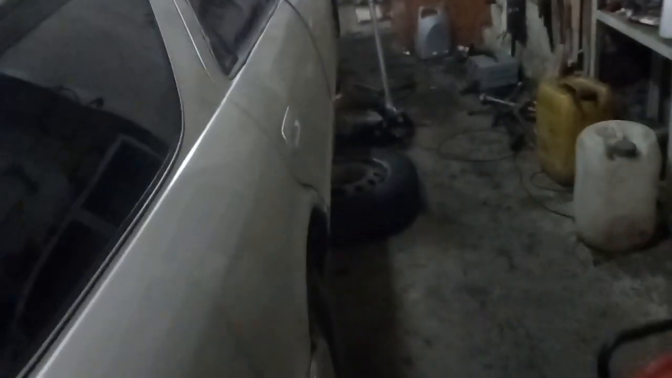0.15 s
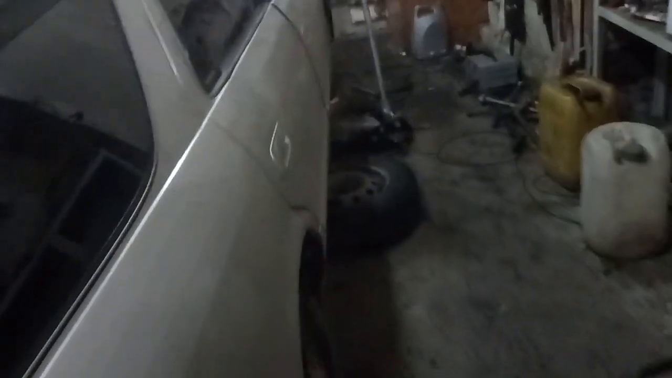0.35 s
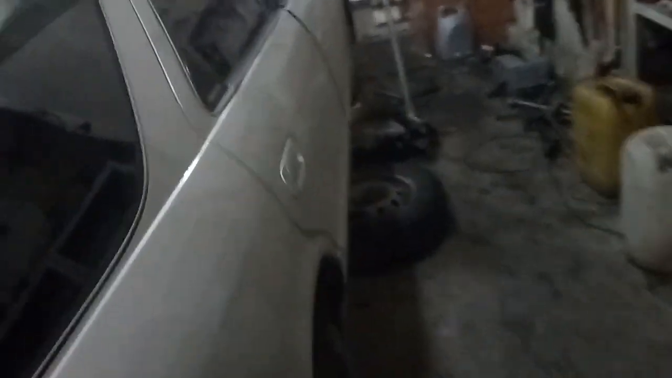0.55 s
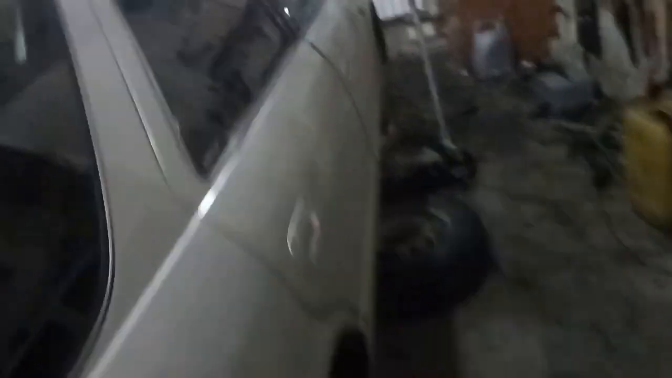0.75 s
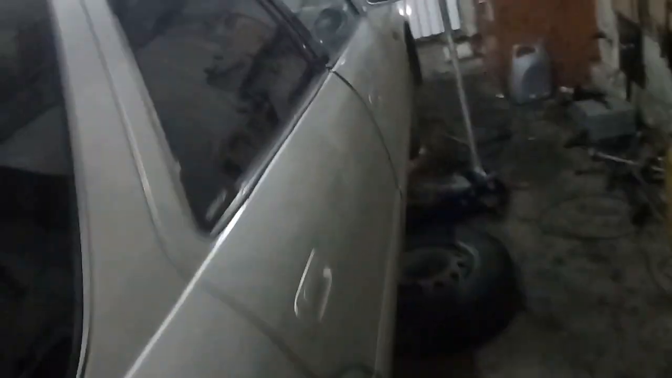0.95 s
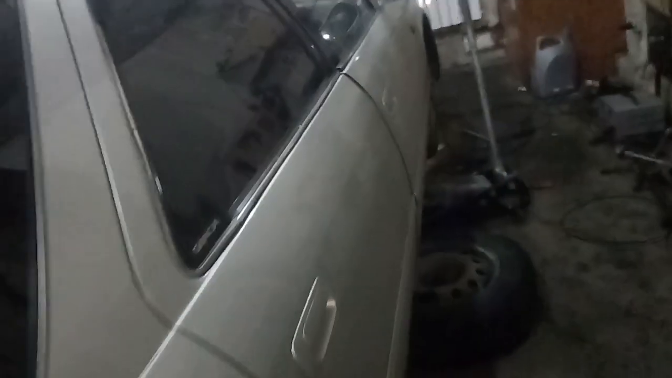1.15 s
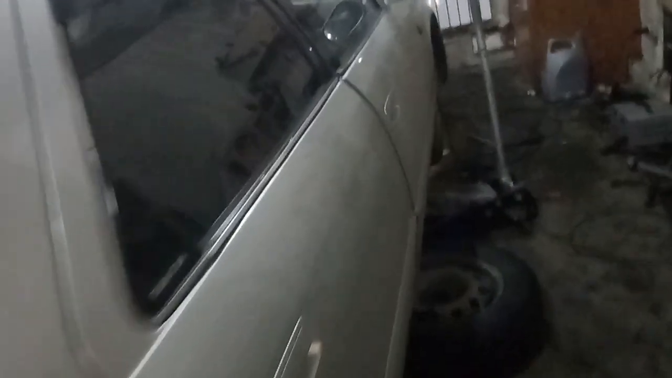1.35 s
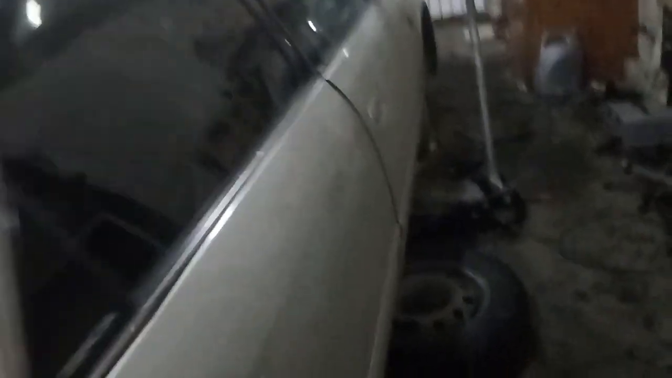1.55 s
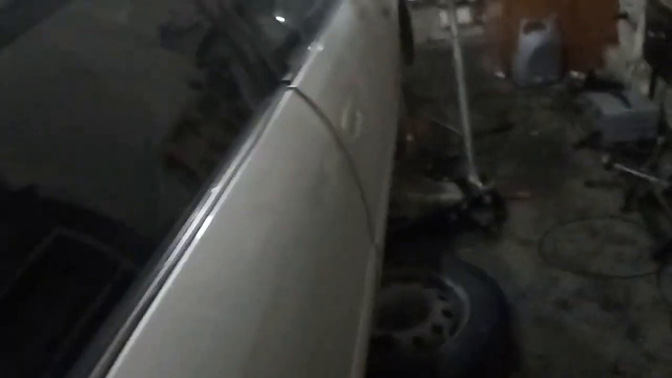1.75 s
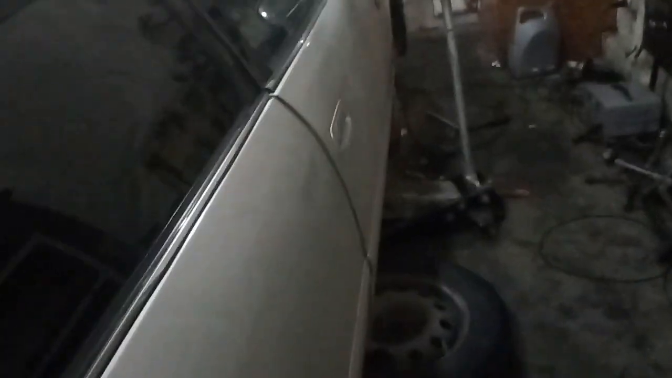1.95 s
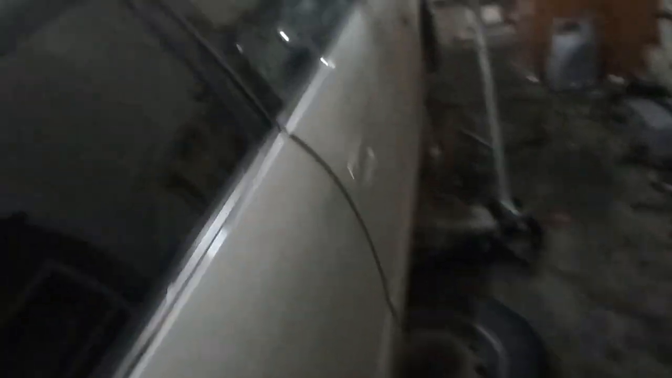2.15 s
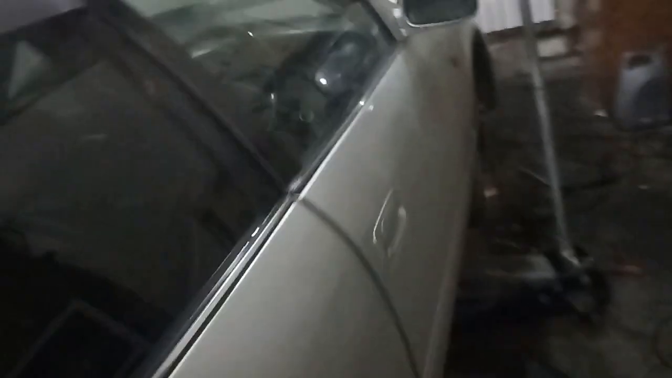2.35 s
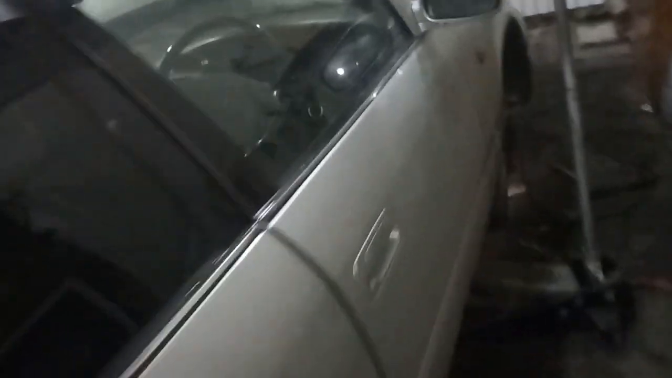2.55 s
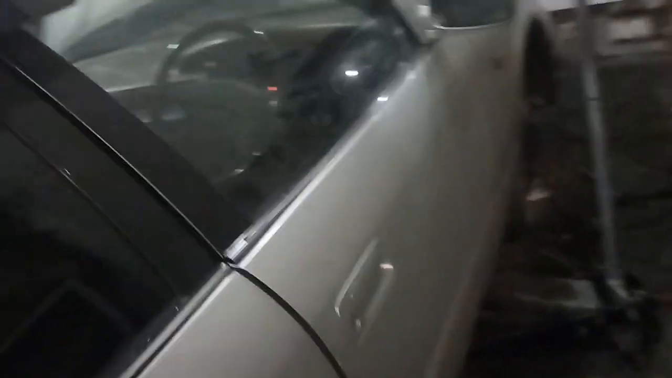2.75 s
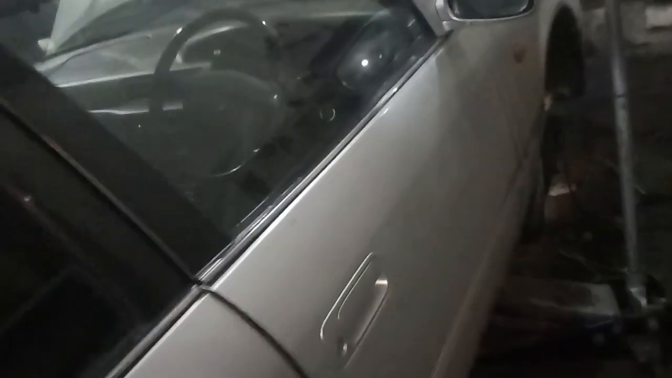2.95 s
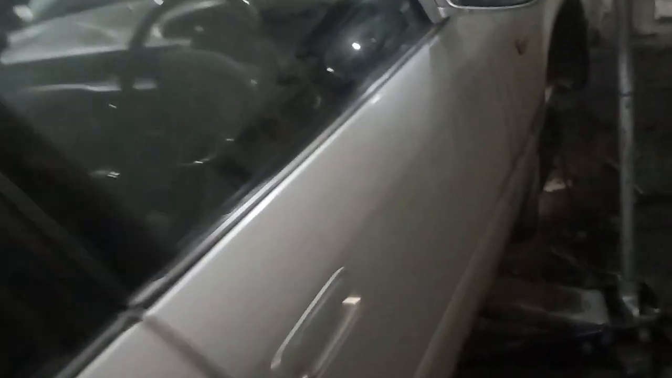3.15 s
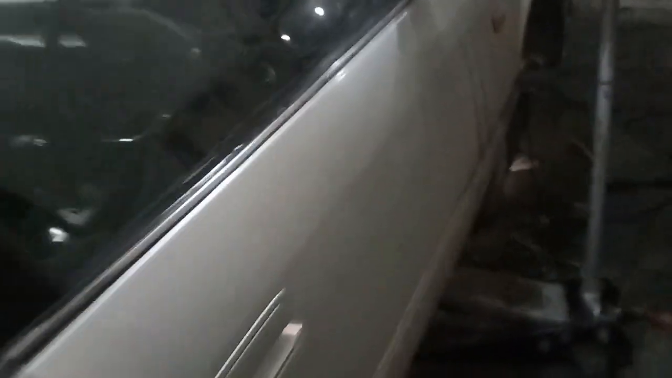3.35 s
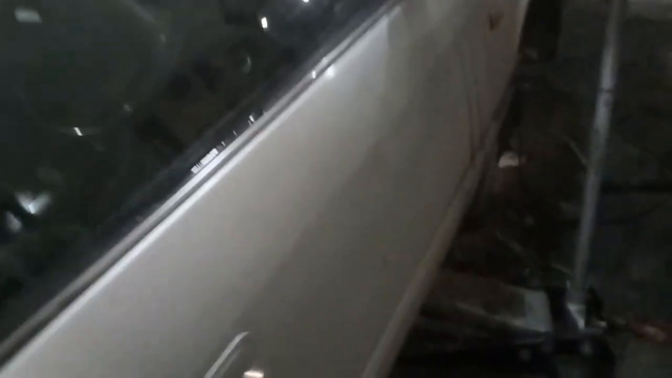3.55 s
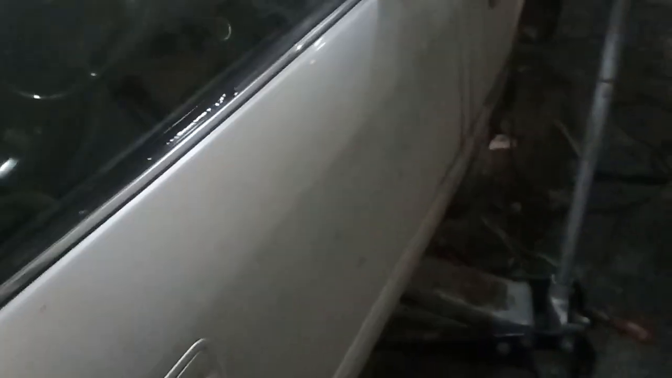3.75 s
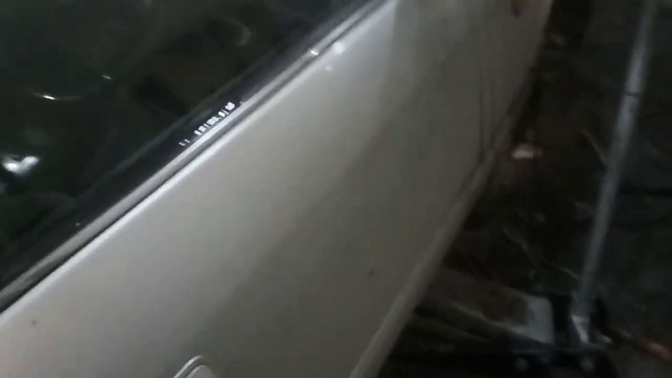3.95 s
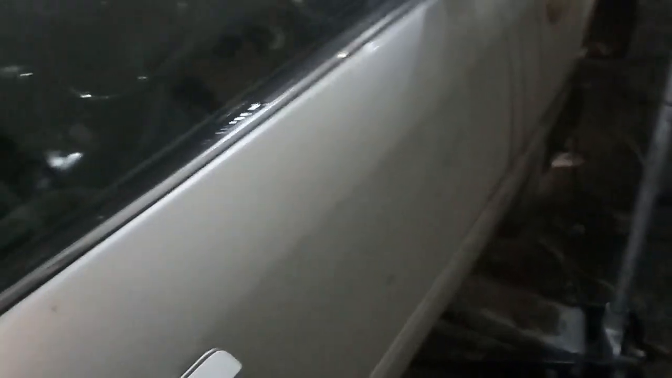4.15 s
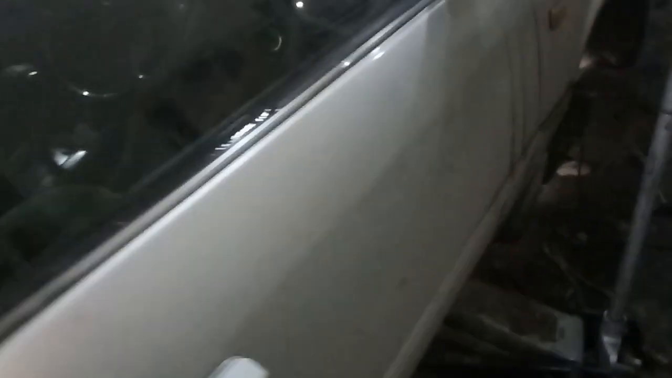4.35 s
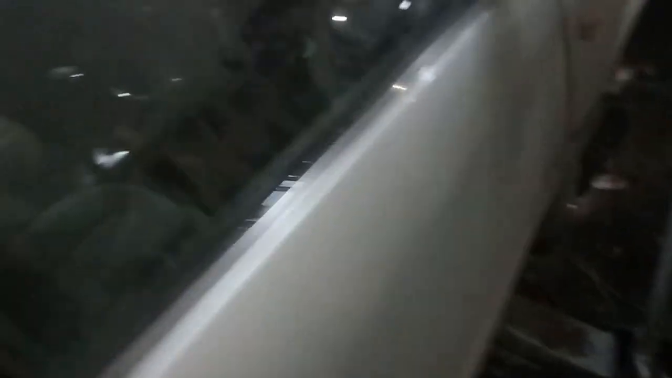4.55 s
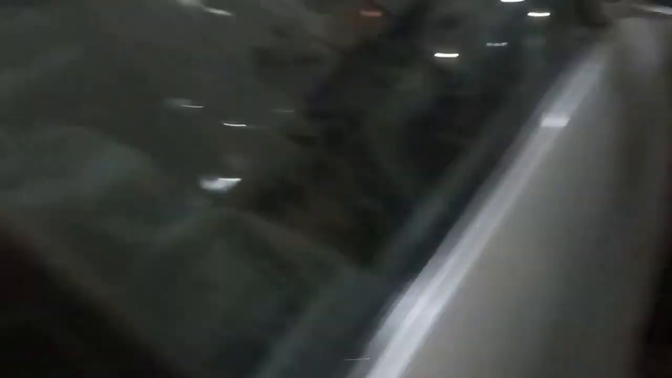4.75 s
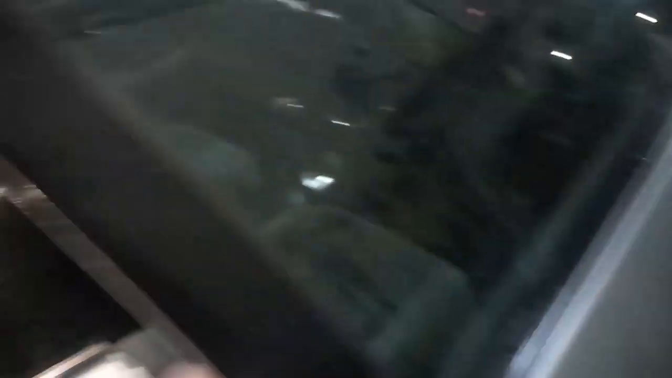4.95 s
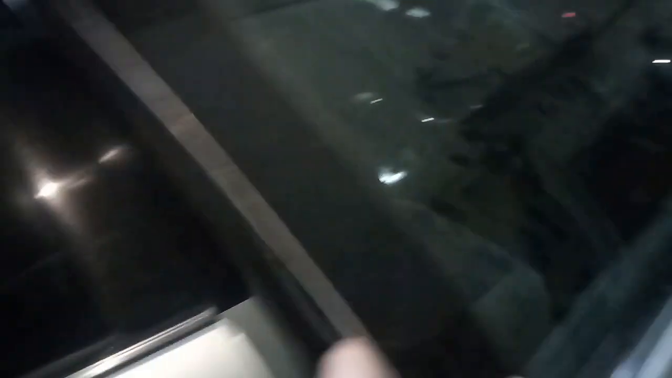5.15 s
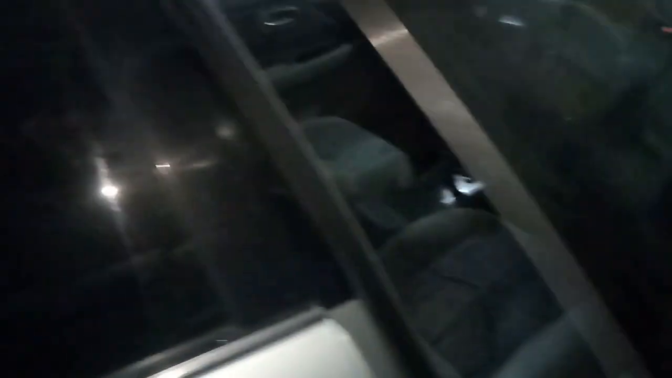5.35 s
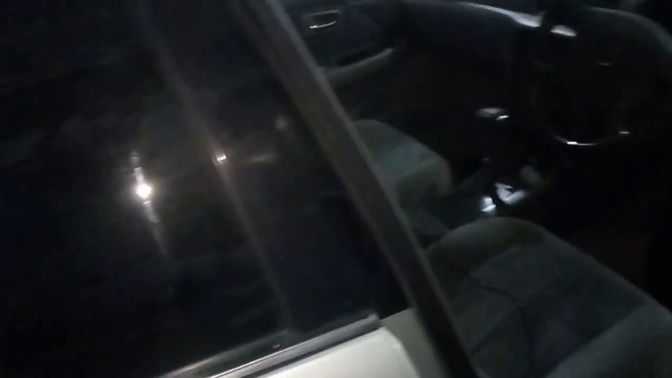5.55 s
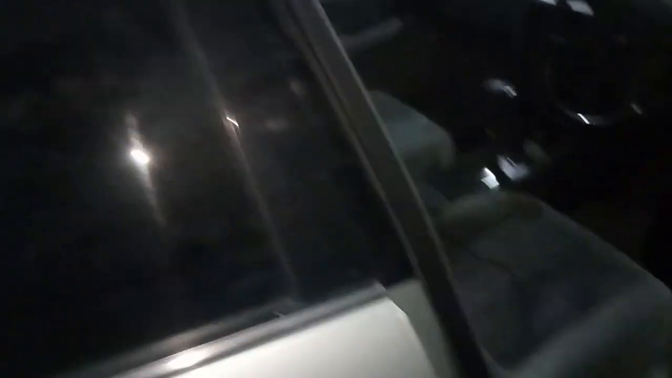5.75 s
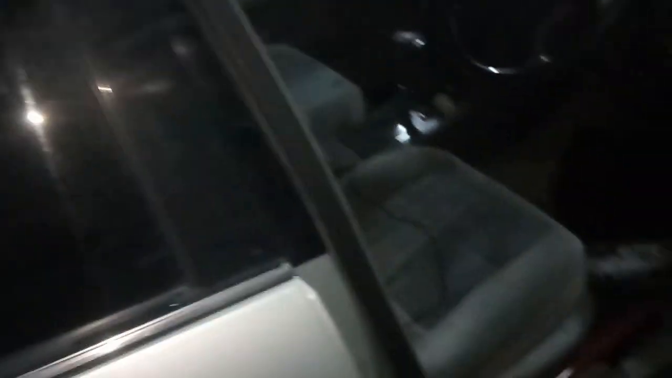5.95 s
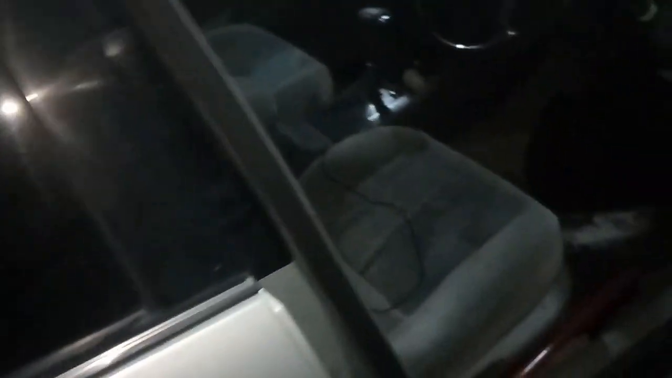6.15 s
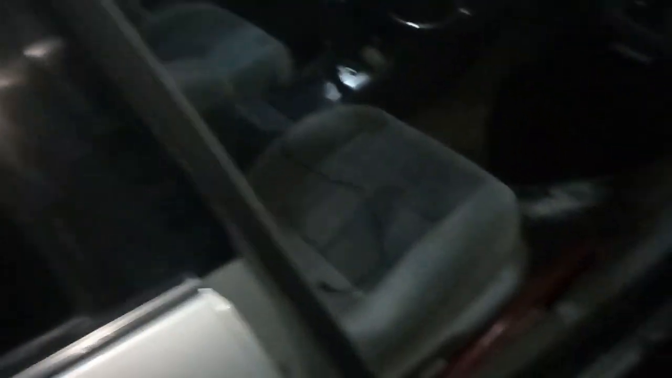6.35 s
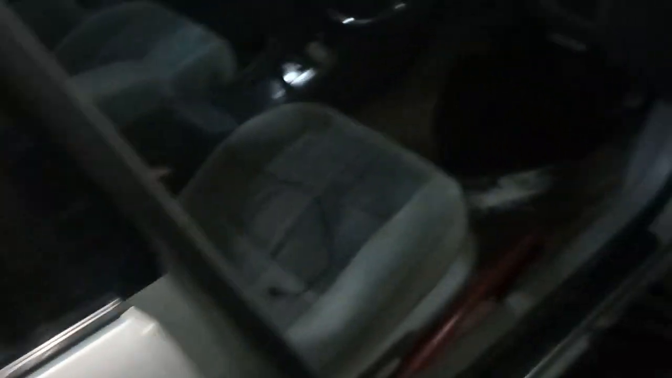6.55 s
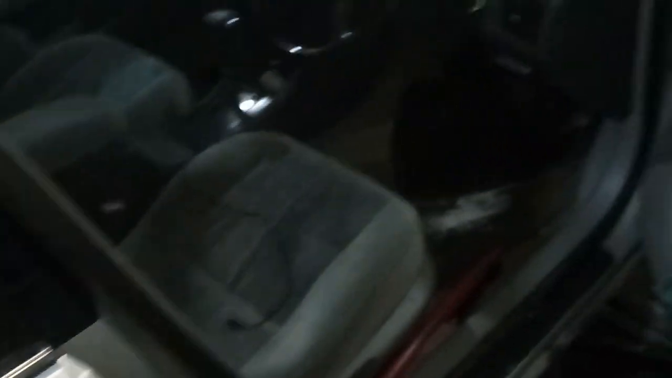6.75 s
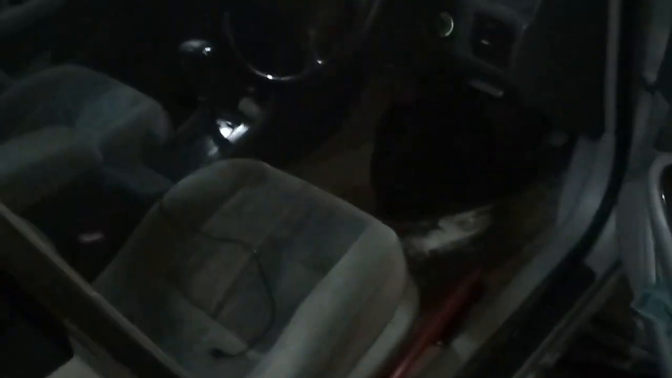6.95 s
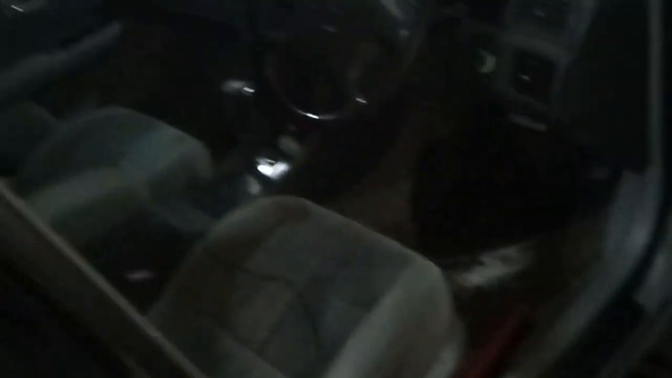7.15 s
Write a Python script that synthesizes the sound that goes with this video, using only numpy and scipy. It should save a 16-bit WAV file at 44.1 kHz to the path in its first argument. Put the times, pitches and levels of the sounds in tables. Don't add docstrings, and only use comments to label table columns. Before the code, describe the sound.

Quiet garage footsteps and cloth rustle, a door handle knocks and rattles, then the car latch clunks and the door swings open softly.

```python
import sys
import numpy as np
from scipy import signal
from scipy.fft import rfft, irfft, next_fast_len
from scipy.io import wavfile
from scipy.ndimage import uniform_filter1d

SR = 44100
rng = np.random.default_rng(int(sys.argv[2]) if len(sys.argv) > 2 else 0)


def log_audio(samples):
    frames = np.atleast_2d(samples).T
    limited = np.clip(frames, -1, 1)
    pcm = np.round(limited * 32767).astype(np.int16)
    wavfile.write(sys.argv[1], SR, pcm)


def invert_db(x):
    u = np.asarray(x, float) / 20
    return 10 ** u


N = 317961

# frequency in Hz, left-right correlation [-1 to 1].
PORT_LIKENESS = [(60, 0.24), (150, 0.59), (380, 0.88), (950, 0.58), (2380, 0.24), (5980, -0.14),
                 (15000, -0.46)]
# time in seconds, lateness of the left port in ms.
PORT_LAG = [(0, -0.13), (1.2, -0.18), (2.2, 0.13), (3, 0.21), (4.1, 0.27), (4.7, 0.21), (5.2, 0.37),
            (6, 0.19), (7.2, -0.12)]
# frequency in Hz, t60 in seconds.
ROOM_DECAY = [(100, 1), (400, 0.19), (1500, 0.98), (5000, 0.41), (12000, 0.38)]
# frequency in Hz, density in dB per Hz.
SCUFF_SPECTRUM = [(8.8, -50), (15, -9), (32, -23.5), (65, -15), (135, -3.5), (243, -9), (351, 0.5),
                  (498, 0.5), (773, -2), (1200, -4), (1560, -33.5), (2640, -120)]
# peak in seconds, peak level in dB, speeding up in seconds, slowing down in seconds,
# left-right difference in dB.
SCUFFS = [(.32, -66, 0.33, 0.35, 0.5), (.65, -60.5, 0.2, 0.33, -2), (1.28, -64.5, 0.5, 0.094, 2),
          (1.8, -65.5, 0.37, 0.43, 0), (2.78, -53.5, 0.23, 0.16, -2), (3.15, -61.5, 0.33, 0.69, -3.5),
          (3.72, -55, 0.46, 0.46, -4), (4.1, -52, 0.2, 0.17, -3), (4.285, -49.5, .06, 0.088, -3),
          (4.66, -57, 0.26, 0.16, -13.5), (4.79, -44, 0.16, 0.173, -1), (5.05, -59.5, 0.57, 0.23, -3),
          (5.36, -65, 0.26, 0.091, -2), (5.95, -52.5, 0.42, 0.41, -2), (6.44, -51, 0.76, 0.25, 0),
          (7.15, -60, 0.34, 0.1, 0)]
# peak in seconds, peak level in dB, speeding up and slowing down in seconds.
SETTLES = [(.384, -71, 0.12, 0.11), (.68, -61.5, 0.2, 0.26), (1.588, -54, 0.09, 0.18),
           (2.41, -52.5, 0.023, 0.14), (2.75, -66, 0.14, 0.28), (3.25, -59.5, 0.066, 0.28),
           (3.716, -61.5, 0.39, 0.95), (4.1, -52, 0.16, 0.43), (4.3, -57, .2, 0.35),
           (4.66, -54.5, 0.25, 0.19), (4.8, -52, .1, 0.18), (5.126, -58.5, 0.088, 0.24),
           (5.38, -63, 0.32, 0.22), (5.842, -56, 0.36, 0.3), (6.4, -57.5, 0.33, 0.25),
           (6.99, -69.5, 0.09, .2)]
# frequency in Hz, density in dB per Hz.
CLOTH_SPECTRUM = [(400, -7), (700, -6), (2200, -6.5), (3700, -5.5), (4800, -1), (6000, 4.5), (7000, 0),
                  (7500, -5.5), (7900, -10), (10500, -7), (13600, -10.5), (14700, 1), (15500, 1.5)]
# peak in seconds, peak level in dB, speeding up in seconds,
# slowing down in seconds, weight of the folds in dB.
SWISHES = [(.28, -57.5, 0.18, 0.72, -3), (.76, -53.5, 0.24, 0.064, -2), (.98, -53, 0.051, 0.21, -6.5),
           (1.18, -59.5, 0.6, 0.2, 1), (1.61, -61, 0.077, 0.64, 0), (2.47, -63.5, 0.11, 0.11, 0.5),
           (2.622, -51, 0.0033, 0.11, -9.5), (2.8, -50, 0.27, 0.19, -2), (3.05, -58.5, 0.46, 0.31, -1),
           (3.43, -58.5, 0.26, 0.44, 0.5), (3.67, -51.5, 0.26, 0.3, -3), (3.99, -52.5, 0.3, 0.11, -0.5),
           (4.14, -57.5, 0.16, 0.054, 6), (4.28, -64, 0.13, 0.16, 4.5), (4.55, -60.5, 0.16, 1, 1.5),
           (4.68, -53, 0.0067, 0.22, 6.5), (4.76, -44.5, 0.06, 0.15, -4), (4.89, -44.5, 0.15, 0.14, -6),
           (5.23, -58, 0.038, 0.11, -6.5), (5.06, -62.5, 0.37, 1, 0), (5.9, -55, 0.5, 0.36, 0),
           (6.18, -44.5, 0.48, 0.55, -4.5), (6.6, -57, 0.97, 0.082, 2), (6.9, -61.5, 0.19, 0.39, -14.5),
           (7.15, -56, 0.52, 0.11, -0.5)]
# time in seconds, nearness in dB, shading of the right port in dB,
# slack of the cloth in dB.
SLEEVE = [(0, 0, 16, 5), (.3, -4, 30, -14.5), (.55, -6, 36, -17.5), (.85, -4, 33, -4), (1.0, -9, 39, -8.5),
          (1.2, -5, 43, -6.5), (2.1, -9.5, 8, -5.5), (2.65, -12.5, 18, -6.5), (3.4, -8, 22, -2.5),
          (3.8, -4.5, 6, -1.5), (4.45, -13.5, 18, -5), (4.78, -1, 6, -2.5), (5.15, -11, 19, -5.5),
          (5.9, -3.5, 13, -3), (6.5, -0.5, 23, -6), (6.75, -4.5, 25.5, -6.5), (6.95, -1.5, 48, -7.5),
          (7.21, -3.5, 34, -6)]
# time in seconds, left-right difference in dB.
ARM_SIDE = [(0.0, 6), (1.97, 3.5), (2.21, 0), (2.45, 4), (3.05, -1), (3.27, 3.5), (3.86, -0.5), (5.14, 0.5),
            (5.3, 4.5), (5.56, -0.5), (6.47, 3), (6.71, 2), (6.79, 3.5), (7.21, 3)]
# time in seconds, level in dB.
PORT_WHISTLE = [(0, -31), (1.2, -4), (2.5, -1.5), (6.5, -2), (7.2, 6.5)]
# start in seconds, level in dB, centre in Hz, t60 in seconds,
# left-right difference in dB.
SCRAPES = [(2.061, -56, 2550, .05, 2), (2.07, -60, 2350, 0.14, 6), (2.071, -53.5, 660, 0.12, 2),
           (2.097, -62, 2250, 0.12, 4), (2.116, -60, 417, 0.061, -6), (2.619, -41, 5340, .03, 6),
           (2.62, -39, 7250, 0.022, 8), (2.62, -50, 13500, .012, 12), (2.625, -54, 14500, .012, 12),
           (3.25, -48, 300, .08, 0), (3.295, -52, 350, 0.046, 0), (3.759, -52, 140, 0.42, -3),
           (4.105, -54, 6200, .1, 0), (4.1216, -39, 2090, .06, 8), (4.1204, -38, 5560, 0.046, -4),
           (4.128, -41, 1090, 0.093, 0), (4.143, -46, 4300, 0.065, 0), (4.1625, -57, 14500, .008, 12),
           (4.1625, -50, 8800, .01, 12), (4.674, -38, 600, .05, 0), (4.756, -44, 3300, 0.055, 0),
           (5.285, -48, 1500, .05, 13), (6.33, -45, 620, .15, -2), (3.735, -47, 380, 0.12, 0),
           (3.825, -53, 130, .15, 0), (4.054, -37, 141, 0.14, 0), (4.091, -40, 125, 0.14, -2),
           (4.089, -40, 410, 0.073, 0), (4.129, -43, 400, .12, 0), (4.254, -46, 330, .08, 0),
           (4.3, -55, 696, .1, 3), (4.335, -56, 420, 0.051, 0), (3.041, -57, 440, .15, 0)]
# time in seconds, level in dB, pitch in Hz,
# left-right difference in dB.
SLIPS = [(0.55, -52, 550, 0), (0.574, -47, 450, 0), (0.607, -47, 600, 0), (.619, -46, 550, -2),
         (.668, -48, 700, -2), (.685, -46, 704, 3), (.7, -37, 380, 0), (.709, -49, 500, 0),
         (.73, -42, 900, 0), (3.184, -40, 960, 0), (3.188, -40, 1000, 8), (3.261, -45, 1000, 8),
         (3.345, -41, 1500, 4), (3.5054, -35, 1300, 10), (5.058, -35, 1730, 15), (5.1662, -37.5, 900, -3),
         (5.1662, -39, 2100, 3), (3.5067, -33, 2480, 13), (3.149, -37, 1900, 16), (.206, -56, 380, 0),
         (.238, -52, 400, 0), (.288, -53, 400, 0), (.301, -51, 300, 0), (.315, -48, 350, 0),
         (.333, -55, 330, 0), (.358, -56, 360, 0), (.382, -51, 300, 0), (.4, -48, 350, 0),
         (.418, -54, 450, 0), (.441, -50, 380, 0), (.525, -52, 550, 0), (.629, -52, 500, 0),
         (.644, -54, 300, 0), (4.0982, -35, 330, -2), (4.1427, -45, 500, 0)]
# start in seconds, level in dB, pitch in Hz, t60 in seconds,
# left-right difference in dB.
PINGS = [(2.0612, -55, 770, 0.027, 2), (3.186, -42, 1010, 0.028, 0), (4.0817, -42, 2200, .015, 0),
         (4.121, -39, 5300, .02, 0), (4.1218, -39, 2000, .03, -4), (4.2805, -39, 612, .04, 1),
         (4.714, -29, 2620, .04, -2), (4.7145, -28.5, 1240, .05, -1), (5.1383, -30, 4470, .009, -9),
         (5.1385, -32.5, 2700, 0.0074, -5), (5.1383, -39, 6000, .006, -8)]
# start in seconds, level in dB, pitch in Hz, t60 in seconds,
# left-right difference in dB.
RATTLES = [(0.5053, -45.5, 5900, 0.031, 11), (0.845, -48, 1530, 0.039, -6), (2.061, -49, 700, 0.055, 2),
           (2.6198, -41, 6400, 0.02, 9), (3.149, -48, 3280, 0.012, 12), (4.001, -47, 4540, 0.019, 15),
           (4.0817, -39, 3460, 0.038, -2), (4.122, -33.5, 4120, 0.037, -1), (4.1444, -53, 3960, .04, 0),
           (4.1625, -50, 9000, 0.005, 18), (4.674, -34, 2640, 0.045, -2), (4.85, -39, 4930, 0.022, -2)]
# start in seconds, level in dB, pitch in Hz, t60 in seconds,
# upper ring in dB relative to the low one.
STEPS = [(0.703, -46.5, 266, 0.13, -17), (0.729, -41.5, 307, 0.061, -3), (1.527, -38.5, 157, 0.1, -8),
         (1.56, -42.5, 153.4, 0.23, -2.5), (1.594, -58, 151, 0.33, -13), (2.064, -48, 600, 0.041, -16),
         (2.075, -56, 323, 0.11, -4), (2.099, -49, 365, 0.068, -3), (2.388, -49, 335, 0.071, -11),
         (2.4, -33, 165.5, 0.15, -5.5), (2.439, -53, 153, 0.18, -3), (2.643, -53.5, 346, 0.2, -14),
         (3.035, -55, 430, .1, -12), (3.059, -47.5, 447, 0.09, -12), (3.24, -48, 148, 0.73, -8),
         (3.732, -50, 247, 0.62, -12)]
# seconds, dB, Hz, seconds, dB.
HANDLE = [(4.064, -34, 430, 0.037, 4), (4.083, -30, 251, 0.13, -7), (4.096, -25, 239, 0.11, -9),
          (4.138, -27, 256, 0.11, -4), (4.152, -28, 122.4, 0.25, -16), (4.185, -36, 115.6, 0.18, -31),
          (4.253, -33.5, 149, 0.16, -6.5), (4.276, -46.5, 292, 0.094, -0.5), (4.285, -35, 484, 0.092, -5),
          (4.328, -35.5, 142, 0.1, -18), (4.6693, -24.5, 237.2, 0.44, -10.5)]
# seconds, dB, Hz, seconds, dB.
SWING = [
    (5.07, -42, 168.5, 0.062, -17),
    (5.087, -39.5, 127.7, 0.24, -6.5),
    (5.29, -38.5, 308, 0.058, -9),
    (5.718, -42.5, 338, 0.087, 1),
    (6.325, -43, 304, 0.45, -1),
    (6.943, -55.5, 530, 0.11, -2),
]
# frequency in Hz, level in dB, t60 in seconds.
DOOR_MODES = [(157.8, -1.5, 0.29), (237.7, 3.5, 0.14), (401, 4.5, 0.11), (551, 3.5, 0.11), (722, -8, 0.1),
              (843, -3.5, 0.067), (1043, -8, 0.057), (318, 2.5, 0.11), (1310, -21, 0.077),
              (1606, -14.5, 0.075), (2150, -35, 0.05), (2620, -16, .045), (3540, -34, 0.0294),
              (5900, -31.5, 0.035)]
# start in seconds, level in dB, hardness [share of 9 dB per octave].
PAWL_CONTACTS = [
    (4.7142, -21.5, 0.71),
    (4.7183, -14, -0.0062),
    (4.727, -17.5, 0.27),
    (4.7407, -25.5, -0.056),
    (4.7491, -22, -0.46),
]
# lower edge in Hz, upper edge in Hz, level in dB, t60 in seconds.
CRACK_BANDS = [(450, 1150, -30, 0.17), (900, 1740, -31.5, 0.11), (1500, 2800, -34.5, 0.04),
               (3000, 5900, -34, 0.033)]


def evened(x):
    return x / np.sqrt(np.mean(x ** 2) + 1e-20)


def read(points, hz):
    f, value = np.transpose(points)
    return np.interp(np.log(hz + 1), np.log(f + 1), value)


def columns(rows, t):
    s, *values = np.transpose(rows)
    return [np.interp(t, s, v) for v in values]


def bandpass(lo_hz, hi_hz):
    return signal.butter(2, [lo_hz, hi_hz], "band", fs=SR, output="sos")


def sides(db):
    left = invert_db(db)
    return np.array([left, np.ones_like(left)]) * 2 / (1 + left)


def add(mix, s, sound, pan_db=0.):
    late = columns(PORT_LAG, s)[0] * SR / 2000
    for side, gain, shift in zip(mix, sides(pan_db), (late, -late)):
        part = side[round(s * SR + shift):][:len(sound)]
        part += gain * sound[:len(part)]


def ring(t, hz, t60, rise_s, phase=0.):
    onset = 1 - np.exp(-(t / rise_s) ** 2)
    return onset * invert_db(-60 * t / t60) * np.sin(2 * np.pi * (hz * t + phase))


def strokes(rows, rest_db):
    roundness, steepness = 1.36, 1.316
    t = np.arange(0, N / SR + .002, .001)
    s, db, swell, fade, *more = np.array(rows).T[:, :, None]
    way = np.where(t < s, (s - t) / np.maximum(swell, .002), (t - s) / np.maximum(fade, .002))
    speed = 1 - np.minimum(way, 1) ** roundness
    power = invert_db(2 * db) * speed ** (2 * steepness)
    total = power.sum(0) + invert_db(2 * rest_db)
    curves = [10 * np.log10(total)]
    curves += [(power * m).sum(0) / total for m in more]
    return [np.interp(np.arange(N) / SR, t, curve) for curve in curves]


def friction(spectrum, edges_hz, size, patchy_db, grain_db):
    hop = size // 4
    frames, hz = N // hop + 5, np.fft.rfftfreq(size, 1 / SR)
    a, b, c, d, patches = rng.standard_normal((frames, len(hz), 5)).T
    shared, separate = a + 1j * b, c + 1j * d
    patches = uniform_filter1d(patches, size=8, axis=0)
    patches = evened(uniform_filter1d(patches, size=10, axis=1))

    same = np.clip(read(PORT_LIKENESS, hz), 0, 1)[:, None]
    lag_ms = columns(PORT_LAG, np.arange(frames) * hop / SR)[0]
    late = np.exp(-2j * np.pi * hz[:, None] * lag_ms / 1000)
    z = np.array([shared * late, same * shared + np.sqrt(1 - same ** 2) * separate])
    z *= invert_db(read(spectrum, hz)[:, None] + patchy_db * patches)
    noise = signal.istft(z, nperseg=size, noverlap=size - hop)[1][:, :N]

    snags = uniform_filter1d(rng.exponential(1, N) ** 2 - 2, size=size // 8)
    snags = invert_db(grain_db * evened(snags))
    long = next_fast_len(N)
    whole, hz = rfft(noise, long), np.fft.rfftfreq(long, 1 / SR)
    bands = []
    for lo, hi in zip(edges_hz, edges_hz[1:]):
        share = 1 / np.sqrt((1 + (lo / (hz + 1)) ** 12) * (1 + (hz / hi) ** 12))
        band = snags * irfft(whole * share, long)[:, :N]
        bands.append(band / np.sqrt(np.mean(band.mean(0) ** 2)))
    return bands


def garage(x):
    taps = np.zeros((2, SR // 2 + 400))
    slots = np.arange(300, SR // 2, 20)
    at = slots + rng.integers(0, 20, (2, len(slots)))
    np.put_along_axis(taps, at, rng.choice([-1., 1.], at.shape), 1)
    taps[1] = taps[0] + 0.57 * taps[1]
    hz, t, z = signal.stft(taps, SR, nperseg=512)
    decay = invert_db(-60 * t / read(ROOM_DECAY, hz)[:, None])
    tail = signal.istft(z * decay, SR, nperseg=512)[1]
    tail = tail / np.linalg.norm(tail[0])
    return signal.fftconvolve(x.mean(0)[None], tail, axes=1)[:, :N]


def shuffle():
    scuff_db, pan_db = strokes(SCUFFS, rest_db=-76.5)
    boom_db, = strokes(SETTLES, rest_db=-73.5)
    sway_db = -74.5 + 0.91 * (boom_db + 66.5)
    sway, boom, scuff = friction(SCUFF_SPECTRUM, [12, 75, 250, 900], size=2048, patchy_db=1.2, grain_db=1.3)
    scuffing = invert_db(scuff_db) * sides(pan_db) * scuff
    swaying = invert_db(sway_db) * sides([-4.]) * sway
    return scuffing + invert_db(boom_db) * boom + swaying


def jacket():
    t = np.arange(N) / SR
    rest_db = -73.5
    rub_db, heavy_db = strokes(SWISHES, rest_db)
    heavy_db = heavy_db - .5 * np.maximum(rest_db + 4.0 - rub_db, 0)
    weave_db, weave_pan_db, slack_db = columns(SLEEVE, t)
    light_db = slack_db + 0.29 * heavy_db - 0.1 * (rub_db + 49.0)
    edges_hz = [800, 2300, 4000, 7600, 13800, 17000]
    heavy, light, rub, weave, port = friction(CLOTH_SPECTRUM, edges_hz, size=512, patchy_db=1.5, grain_db=0.76)
    body = rub + invert_db(heavy_db) * heavy + invert_db(light_db) * light
    body = sides(columns(ARM_SIDE, t)[0]) * body
    fine = invert_db(-4.5) * weave + invert_db(columns(PORT_WHISTLE, t)[0]) * port
    fine = sides(weave_pan_db) * invert_db(weave_db) * fine
    return invert_db(rub_db) * (body + fine)


def scrapes():
    out, t = np.zeros((2, N)), np.arange(SR // 4) / SR
    width = .14
    for s, db, hz, t60, pan_db in SCRAPES:
        band = bandpass(hz / (1 + width), min(hz * (1 + width), SR / 2.2))
        crowd = evened(signal.sosfiltfilt(band, rng.standard_normal(len(t))))
        onset = np.minimum(t * hz / 2, 1)
        add(out, s, invert_db(db - 60 * t / max(t60, .003)) * onset * crowd, pan_db)
    return out


def pops():
    out, t = np.zeros((2, N)), np.arange(-60, 400) / SR
    for s, db, hz, pan_db in SLIPS:
        cycles = t * hz
        slip = -np.sin(2 * np.pi * cycles) * np.exp(-(cycles / 0.42) ** 2)
        after = ring(np.maximum(t, 0), 1.9 * hz, 4.6 / hz, 0.1 / hz)
        add(out, s - 60 / SR, 1.4 * invert_db(db) * (slip + 0.31 * after), pan_db)
    return out


def pings():
    out, t = np.zeros((2, N)), np.arange(3000) / SR
    for s, db, hz, t60, pan_db in PINGS:
        add(out, s, invert_db(db) * ring(t, hz, max(t60, .003), .5 / hz), pan_db)
    return out


def ticks():
    out, t = np.zeros((2, N)), np.arange(3000) / SR
    for s, db, hz, t60, pan_db in RATTLES:
        u = rng.random(2)
        rings = ring(t, hz, t60, .0001)
        rings += 0.2 * ring(t, hz * (0.46 + 0.18 * u[0]), 0.91 * t60, .0001)
        rings += 0.27 * ring(t, hz * (1.4 + 0.364 * u[1]), 0.65 * t60, .0001)
        band = bandpass(hz / 2.0, min(1.35 * hz, 16000))
        snap = signal.sosfilt(band, rng.standard_normal(len(t))) * invert_db(-60 * t / t60)
        add(out, s, invert_db(db) * (.55 * rings + 1.4 * snap), pan_db)
    return out


def thuds():
    out, t = np.zeros((2, N)), np.arange(SR // 2) / SR
    contact_s, press_share = 0.0021, 0.026
    strain_s, strain_length_s, strain_db = 4.7, .01, -9
    for k, (s, db, hz, t60, upper_db) in enumerate(STEPS + HANDLE + SWING):
        u = rng.random(3)
        t60 = np.clip(t60, .015, .6)
        by_foot = k < len(STEPS)
        rise = contact_s if by_foot else .5 * contact_s + press_share * t60
        low = ring(t, hz, t60, rise)
        low += 0.35 * ring(t, hz * (1.3 + 0.075 * u[0]), t60, rise, u[1])
        upper = ring(t, hz * (2.1 + 0.31 * u[2]), 0.47 * t60, rise, u[0])
        upper += 0.24 * ring(t, hz * (2.9 + 0.47 * u[1]), 0.99 * t60, rise, u[2])
        stilled = np.clip((s + t - strain_s) / strain_length_s, 0, 1) * (s < strain_s)
        add(out, s, invert_db(db + strain_db * stilled) * (low + invert_db(upper_db) * upper), -.8)
    return out


def latch():
    out, t = np.zeros((2, N)), np.arange(SR // 4) / SR
    places = rng.random((len(DOOR_MODES), 2))
    for s, blow_db, hard in PAWL_CONTACTS:
        for (hz, db, t60), (phase, place) in zip(DOOR_MODES, places):
            pan_db = -1.5 + 12 * (place - .5) * min(hz / 1000, 1)
            free_phase = hz > 350 or hz < 200
            mode = ring(t, hz, 0.48 * t60, 0.99 / hz, phase * free_phase)
            tilt_db = 9.0 * hard * np.log2(hz / 400)
            add(out, s, invert_db(blow_db + db + tilt_db) * mode, pan_db)

    start = round(PAWL_CONTACTS[0][0] * SR)
    onset = np.minimum(t / 0.00052, 1)
    for lo_hz, hi_hz, db, t60 in CRACK_BANDS:
        band = signal.sosfilt(bandpass(lo_hz, hi_hz), rng.standard_normal((2, len(t))))
        blurred = evened(band + 0.23 * band[::-1])
        out[:, start:start + len(t)] += invert_db(db - 60 * t / t60) * blurred * onset
    return out


def scene():
    blows = thuds() + ticks() + pops() + pings() + latch()
    blows = signal.sosfilt(signal.butter(3, 105, "high", fs=SR, output="sos"), blows)
    return blows + invert_db(-14.5) * garage(blows) + jacket() + shuffle() + scrapes()


def low_pass(x):
    return signal.sosfilt(signal.butter(12, 16800, fs=SR, output="sos"), x)


def record(dry):
    x = signal.sosfilt(signal.butter(1, 25, "high", fs=SR, output="sos"), dry)
    x = .55 * np.tanh(x / .55)
    band_limit = signal.firwin(1601, 15680, window=("kaiser", 7), fs=SR)
    mix = signal.oaconvolve(x, band_limit[None], "same")
    return low_pass(mix)


dry = scene()
out = record(dry)
log_audio(out)
```